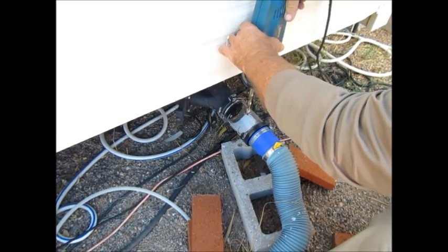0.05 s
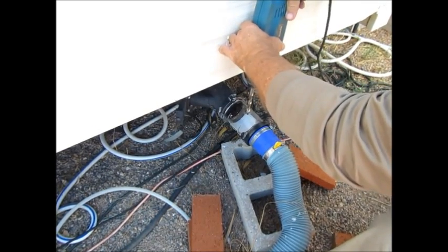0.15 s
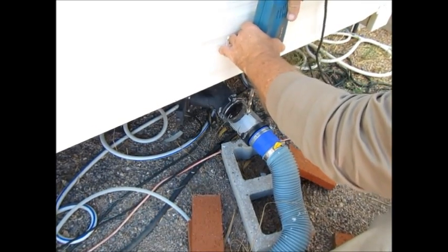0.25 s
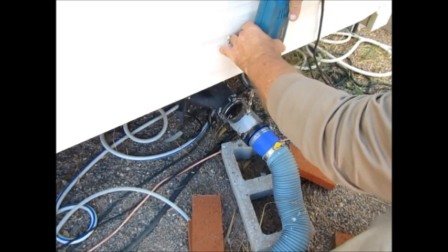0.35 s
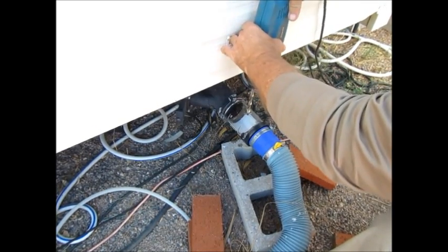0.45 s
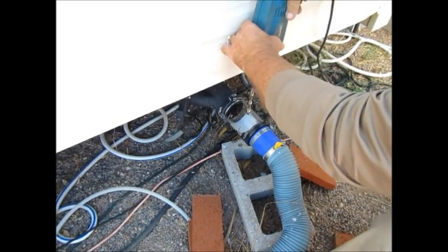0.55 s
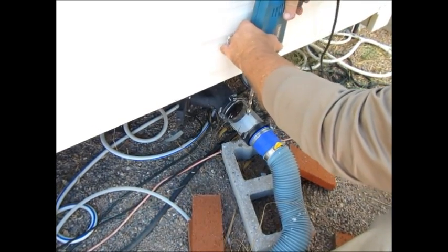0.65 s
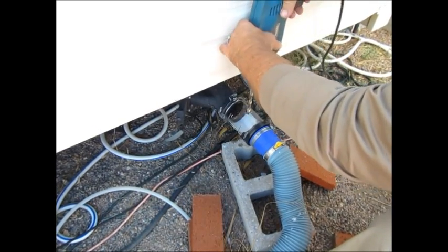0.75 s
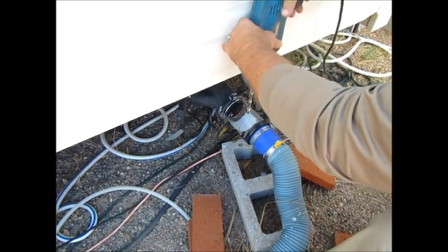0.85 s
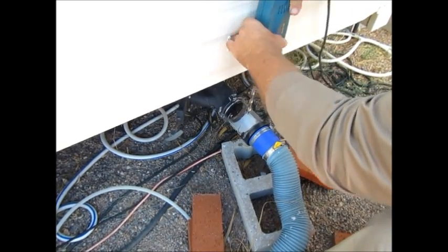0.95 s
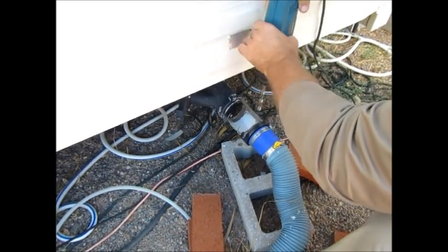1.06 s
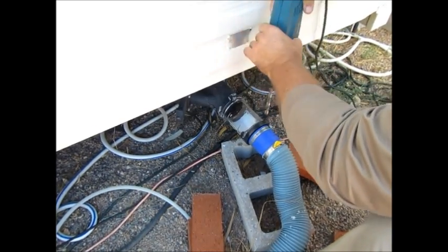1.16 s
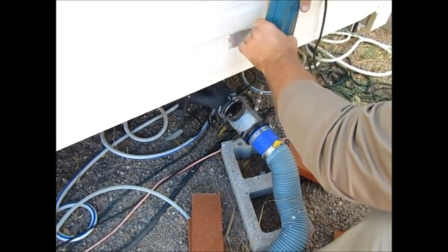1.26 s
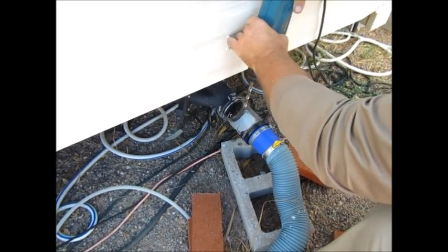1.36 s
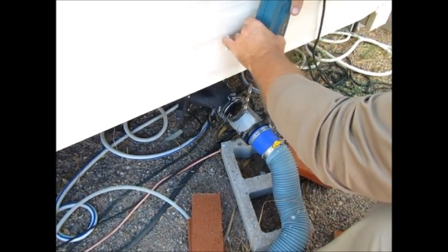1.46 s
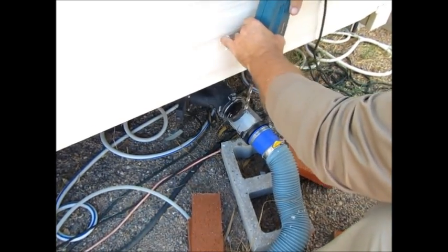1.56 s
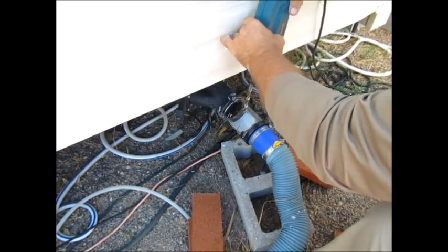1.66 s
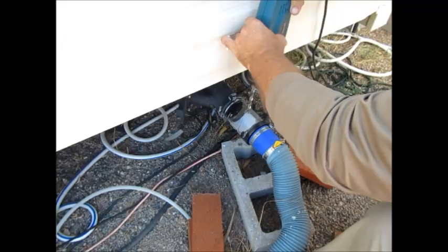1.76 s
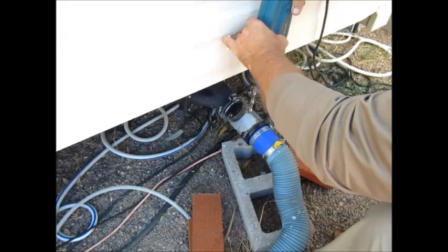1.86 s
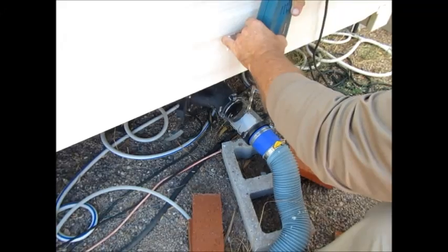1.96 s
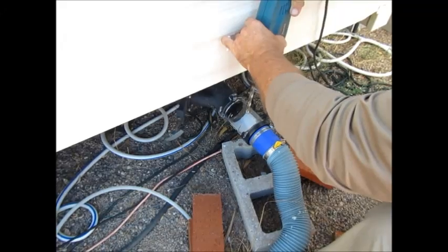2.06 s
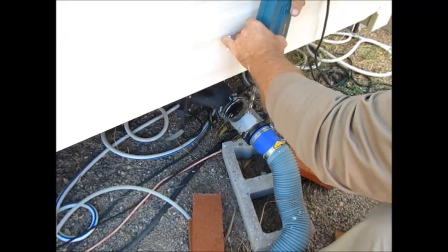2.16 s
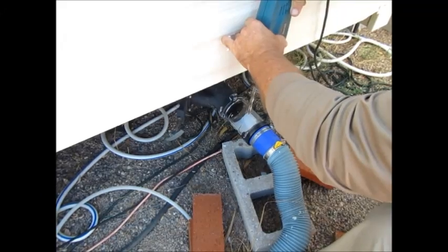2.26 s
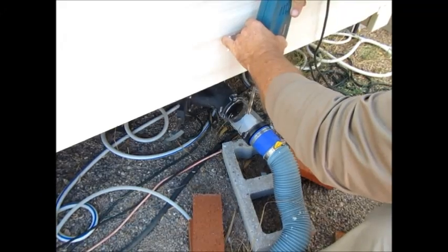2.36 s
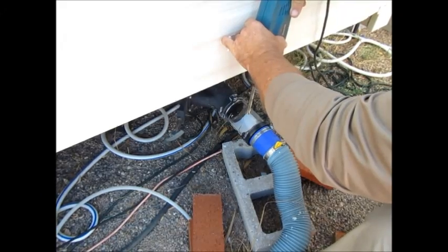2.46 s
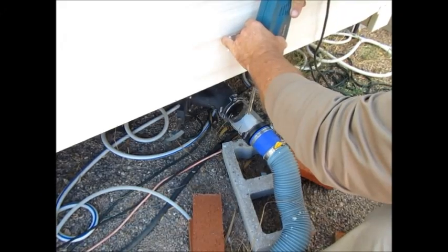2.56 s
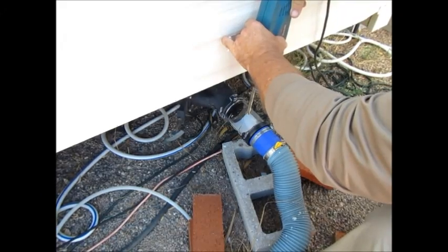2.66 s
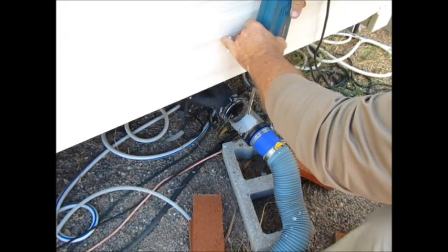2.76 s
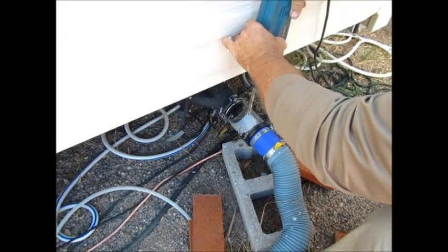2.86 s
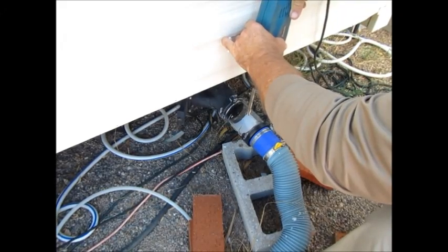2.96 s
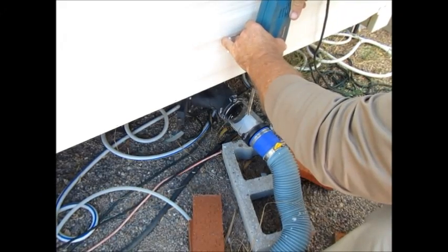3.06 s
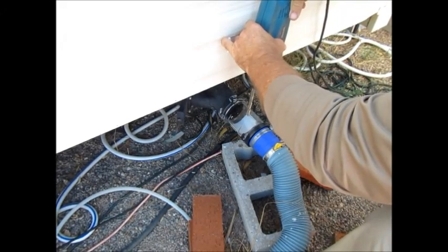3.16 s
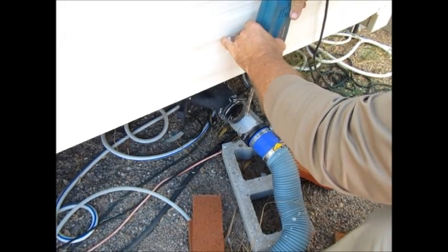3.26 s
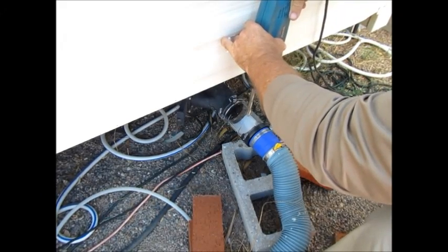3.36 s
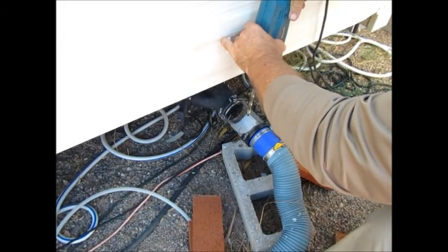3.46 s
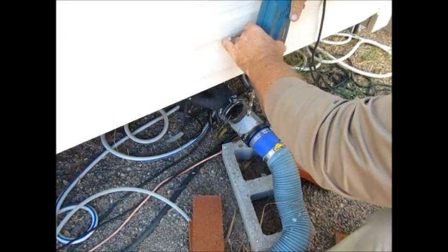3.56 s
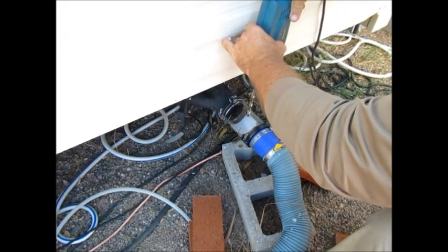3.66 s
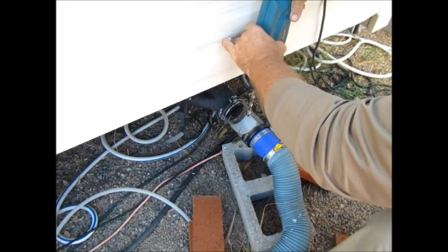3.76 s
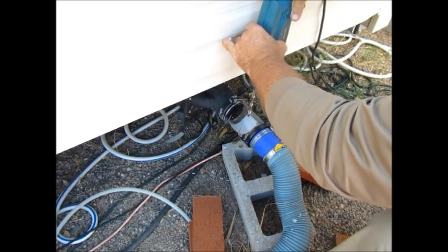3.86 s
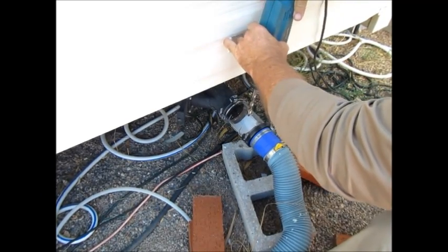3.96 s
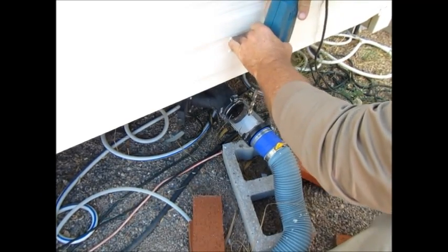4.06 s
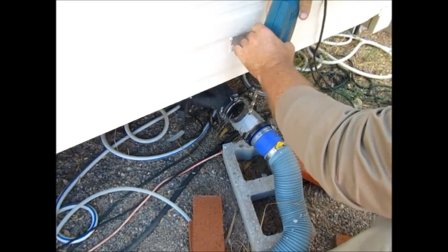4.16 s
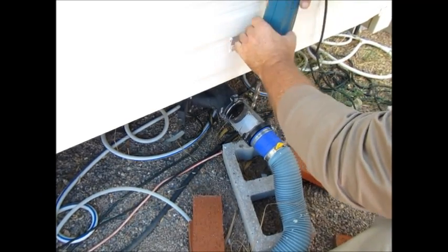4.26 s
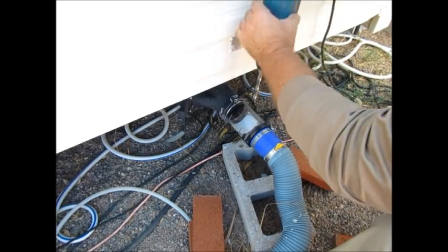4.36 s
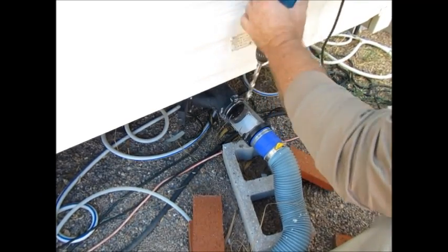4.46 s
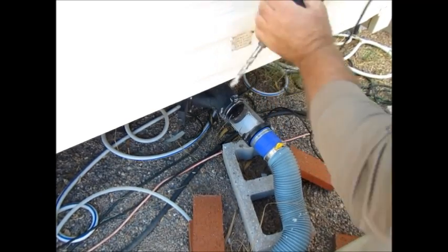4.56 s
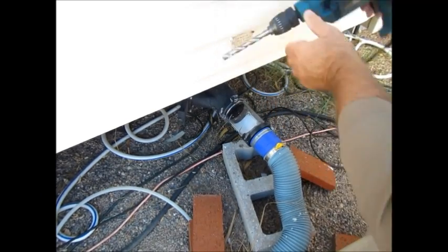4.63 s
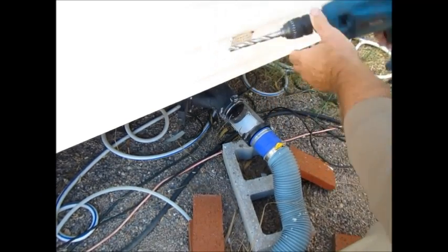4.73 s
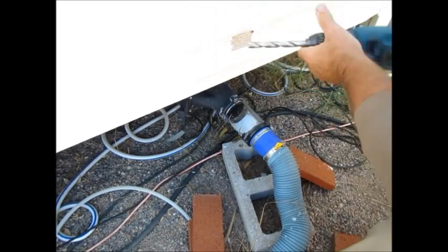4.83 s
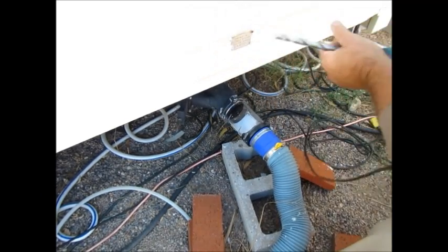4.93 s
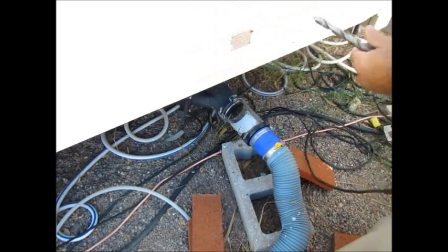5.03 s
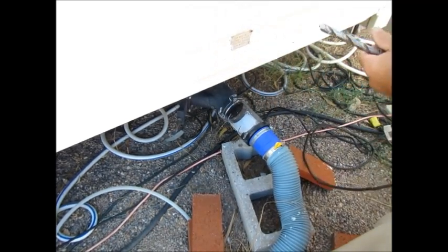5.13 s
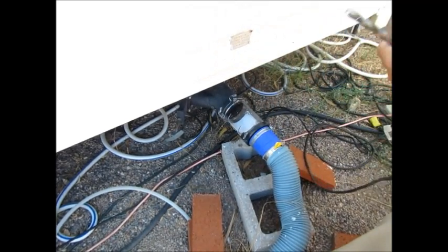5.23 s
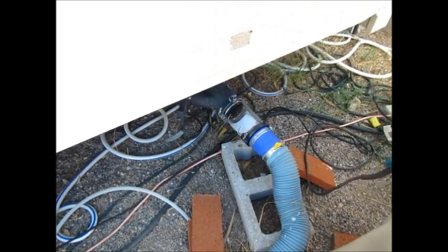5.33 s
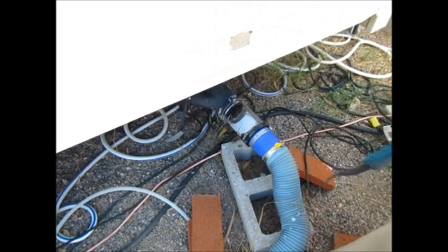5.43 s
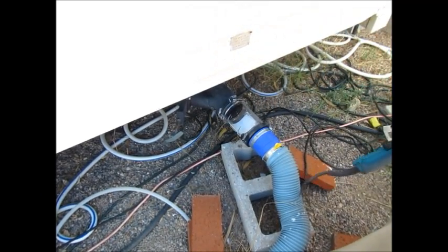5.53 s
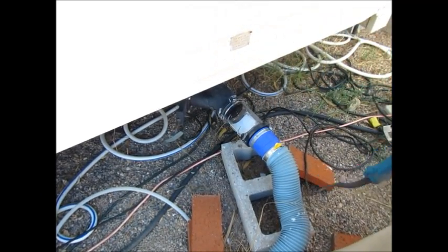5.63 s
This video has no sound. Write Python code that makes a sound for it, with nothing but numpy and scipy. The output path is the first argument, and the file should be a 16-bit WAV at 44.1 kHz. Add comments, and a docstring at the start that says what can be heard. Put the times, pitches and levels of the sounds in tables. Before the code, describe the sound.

A close, dry, centred outdoor sound of a mains drill on a plastic panel. It opens with the drill already coasting: a fluttering, chattering gear whine holds briefly, then drops and rattles out by about 0.6 s. Quiet follows, with far traffic rumble, a wavering low hum near 120 Hz and faint insect hiss, plus clicks and dull panel knocks, the firmest near 1.1 s. At 1.7 s the drill creeps on in a coarse, buzzing, pulsed growl. Around 2.3 s it surges, climbing quickly to a bright, piercing whine with dense grinding and brush hiss, roughly steady from 2.8 to 3.5 s. A sharp click at 3.5 s marks release; the whine glides down with loose gear chatter, falls quickly after 4 s and ends in a small rattle by about 4.3 s. Light ticks continue, with a soft knock at 5.3 s, until the end around 5.7 s.

```python
"""Outdoors in a yard, a mains hand drill coasts to a stop, starts slowly, bores a plastic panel and coasts again.
Motor whines are tones on multiples of the shaft speed; the drill's grind is coloured noise that comes in kicks.
With the motor running free, loose gear teeth chatter: fluttering tones on multiples of the tooth rate.
Hands knock the panel and small parts tick: short noise bursts. Behind them far traffic rumbles, a machine hums
and insects hiss, made of noise bands and a wavering tone. All of it reaches one microphone."""
import sys
import numpy as np
from scipy import signal
from scipy.fft import rfft, irfft
from scipy.io import wavfile
from scipy.ndimage import uniform_filter1d

SR = 44100
rng = np.random.default_rng(int(sys.argv[2]) if len(sys.argv) > 2 else 0)


def file_out(sig):
    """Save sig as 16-bit WAV at sys.argv[1]."""
    # one column per channel
    cols = np.atleast_2d(sig).T
    # limit, then scale
    lim = np.clip(cols, -1, 1)
    pcm = np.round(lim * 32767).astype(np.int16)
    wavfile.write(sys.argv[1], SR, pcm)


N = 250929  # length in samples

TEETH, WHEEL_TEETH = 4, 41  # gear teeth on the motor shaft's pinion and on the big wheel
SLOTS, BARS = 12, 24  # rotor slots and commutator bars: whine cycles per shaft turn
WHISTLES = (36, 37)  # whistle cycles per shaft turn

# colour of the brush hiss, relative: (frequency [Hz], level [dB])
BRUSH_HISS = [(3240, -20.5), (5500, 3), (6250, -5), (8020, -2), (11000, -5), (11800, -1.5), (13800, -3.5),
              (15100, -9.5), (15700, -5)]


def amp(db):
    """Turns decibels into a gain."""
    return 10 ** (np.asarray(db) / 20)


def evened(x):
    """Scales a signal to an average strength (rms) of 1."""
    return x / np.sqrt(np.mean(x ** 2) + 1e-20)


def read(points, hz):
    """Reads a table at the frequencies hz, in straight lines over a logarithmic scale."""
    f, value = np.transpose(points)
    return np.interp(np.log(hz + 1), np.log(f + 1), value)


def add(mix, start_s, sound):
    """Lays a sound into the mix at its start time."""
    part = mix[round(start_s * SR):][:len(sound)]
    part += sound[:len(part)]


def spread(rows):
    """Draws out a table sample by sample: the time, then every other column."""
    s, *columns = np.transpose(rows)
    t = np.arange(s[0], s[-1], 1 / SR)
    return [t] + [np.interp(t, s, column) for column in columns]


def shaped(x, points, peaks=()):
    """Colours x with a spectrum and resonance peaks, nearly silent outside the table; rms 1."""
    hz = np.fft.rfftfreq(len(x), 1 / SR)
    shut_ends = [(points[0][0] / 2, -70)] + list(points) + [(points[-1][0], -70)]
    gain = amp(read(shut_ends, hz))
    gain *= 1 + sum(amp(db) / (1 + (2 * (hz - f) / width) ** 2) for f, width, db in peaks)
    return evened(irfft(rfft(x) * gain, len(x)))


def wander(n, hz):
    """Slow random curve of about rms 1, with changes up to hz."""
    lowpass = signal.butter(2, hz, fs=SR, output="sos")
    slow = signal.sosfiltfilt(lowpass, rng.standard_normal(n), padtype="even")
    return np.clip(evened(slow), -2.5, 2.5)


def tone(turns, db, flutter_db, flutter_hz):
    """A tone, one cycle per turn, whose level and phase flutter."""
    slip = rng.uniform(0, 2 * np.pi) + 0.13 * flutter_db * wander(len(turns), flutter_hz)
    level = amp(db + flutter_db * wander(len(turns), flutter_hz))
    return np.sqrt(2) * level * np.cos(2 * np.pi * turns + slip)


def yard():
    """Far rumble and air are lumpy noise made of random short spectra; a hum and insect bands lie on top."""
    # colour of the far rumble, relative: (frequency [Hz], level [dB])
    far_colour = [(15, -31), (25, 1.5), (53, 3.5), (119, -3.5), (150, -9.5), (235, -4.5), (290, -17.5),
                  (404, -8), (647, -18.5), (839, -19.5), (1140, -23.5), (1220, -27), (1700, -30.5),
                  (2480, -38.5), (7000, -92), (9100, -87), (15400, -120)]
    # how loud the background is heard over time:
    # (time [s], level [dB], brightness [dB per octave], hum [dB], thin hiss [dB])
    background_levels = [(0, -49.5, 7.5, -46.5, -55), (.55, -46, 4, -49, -66), (1.25, -40.5, 2, -45, -62),
                         (1.6, -38.5, 3.5, -44.5, -61.5), (2.3, -34, 0.5, -44.5, -54),
                         (2.7, -44.5, 2.5, -42.5, -65), (3.5, -29.5, -2, -41.5, -68),
                         (3.66, -51.5, 8.5, -51, -67), (4.27, -42, 5.5, -47.5, -67),
                         (4.5, -40.5, 2.5, -57.5, -64), (5, -40.5, 3, -50, -61),
                         (5.4, -37.5, 3, -43.5, -58), (5.69, -36, 2.7, -45.5, -60)]
    # colour of the thin air hiss, relative: (frequency [Hz], level [dB])
    air_colour = [(2500, 3.5), (4000, 2), (9000, -5.5), (11800, -9), (12500, -13.5), (15900, -15)]
    # insect bands: (frequency [Hz], width [Hz], level [dB])
    insects = [(7850, 500, -70), (9700, 220, -85), (11200, 180, -83)]
    hum_hz = 121.2  # a far machine

    frames, hz = N // 256 + 5, np.fft.rfftfreq(1024, 1 / SR)
    real, imaginary, patches = rng.standard_normal((frames, 513, 3)).T
    random_spectra = real + 1j * imaginary
    patches = evened(uniform_filter1d(uniform_filter1d(patches, 10, 0), 10, 1))
    s, level_db, tilt_db, hum_db, air_db = np.transpose(background_levels)
    t = np.arange(frames) * 256 / SR
    octaves = np.log2(1 + hz / 300)[:, None]
    field_db = read(far_colour, hz)[:, None] + 1.7 * patches
    # the scale is set before the level changes
    scale = 1 / np.std(signal.istft(random_spectra * amp(field_db), nperseg=1024, noverlap=768)[1])
    field_db = field_db + np.interp(t, s, level_db) + octaves * np.interp(t, s, tilt_db)
    out = scale * signal.istft(random_spectra * amp(field_db), nperseg=1024, noverlap=768)[1][:N]

    now = np.arange(N) / SR
    out += tone(hum_hz * now, np.interp(now, s, hum_db), 4.75, 24.4)
    # little reaches below the rumble
    out = signal.sosfilt(signal.butter(2, 38, "high", fs=SR, output="sos"), out)
    air_level = amp(np.interp(now, s, air_db) + 2 * wander(N, 22.3))
    out += air_level * shaped(rng.standard_normal(N), air_colour)
    for f, width, db in insects:
        edges = [(f - width, -30), (f - width / 2, 0), (f + width / 2, 0), (f + width, -30)]
        band = shaped(rng.standard_normal(N), edges)
        out += amp(db + 0.73 * wander(N, 2.7)) * band
    return out


def handling():
    """Knocks set the damped panel thudding; ticks are short bursts around their own centre."""
    # dull knocks: (time [s], peak [dB], time to fade by 60 dB [s], brightness [dB per octave])
    knocks = [(0.756, -29.5, 0.093, -4), (1.074, -20, 0.1, 3.5), (1.096, -33, 0.045, -2),
              (5.34, -30, 0.056, 2.5)]
    # how the knocked panel sounds, relative: (frequency [Hz], level [dB])
    panel = [(88, -40), (150, -9.5), (295, 3.5), (492, 4), (641, -15.5), (835, -8), (1980, -28),
             (2100, -22), (2950, -33), (5000, -55), (6500, -75), (11000, -120)]
    # ticks of switch, chuck and grit:
    # (time [s], peak [dB], centre [Hz], time to fade by 60 dB [s], top end against the centre [dB])
    ticks = [(0.5736, -44, 2560, 0.023, -33), (0.594, -33, 2310, 0.035, -31), (0.609, -41, 2470, 0.02, -37),
             (0.93, -40, 1970, 0.039, -30), (0.973, -32.5, 1900, 0.051, -35.5),
             (1.5194, -43, 2130, 0.025, -28), (1.531, -34.5, 2000, 0.035, -21.5),
             (1.6394, -65, 2280, 0.019, -28), (1.853, -22, 1980, 0.024, -45), (3.494, -7, 2000, 0.019, -45),
             (4.22, -40, 3400, 0.02, -29), (4.29, -39, 4800, 0.026, -30), (4.347, -45, 2600, 0.025, -32),
             (4.438, -46, 4500, 0.025, -27), (4.5148, -28.5, 2040, 0.02, -45),
             (4.8274, -32, 6100, 0.031, -16), (5, -42, 2460, 0.035, -25), (5.193, -37, 2320, 0.028, -39),
             (5.34, -41, 2300, 0.016, -15), (5.4902, -37, 2700, 0.027, -28), (5.567, -35, 2560, 0.025, -31)]

    out, t = np.zeros(N), np.arange(SR // 8) / SR
    for s, db, fade_s, tilt_db in knocks:
        colour = [(hz, level + tilt_db * np.log2(hz / 300)) for hz, level in panel]
        swing = amp(-60 * t / abs(fade_s)) * (1 - np.exp(-t / 0.0014))  # quick rise, then decay
        thud = shaped(rng.standard_normal(len(t)), colour) * swing
        add(out, s, amp(db) * thud / abs(thud).max())
    for s, db, hz, fade_s, top_db in ticks:
        colour = [(900, -18), (hz, 0), (6500, 0.63 * top_db), (15900, top_db)]
        burst = shaped(rng.standard_normal(len(t)), colour) * amp(-60 * t / abs(fade_s))
        add(out, s, amp(db) * burst / abs(burst).max())
    return out


def coast(speed, rows, octave_db):
    """Running free, teeth slap their backs at the tooth rate; the big wheel runs out of true once a turn."""
    # housing response to the tooth rate and its multiples: (frequency [Hz], level [dB])
    housing = [(300, -14), (700, -8), (850, -3), (990, -8), (1100, 2), (1190, 0), (1240, -12), (1290, -2),
               (1400, -5), (1700, 3), (2100, -3), (2300, 0), (2550, 3), (2900, -4), (3350, 0), (4000, -8),
               (4500, -2), (5000, -8), (5700, -1), (6300, -16), (8000, -11), (9200, -17), (11500, -13),
               (16000, -15)]
    # whistle over the hiss: (shaft speed [Hz], level [dB])
    free_whistle = [(200, -40), (285, -22), (310, -11), (350, -10), (400, -17), (440, -22)]
    # colour of the whirr, relative: (frequency [Hz], level [dB])
    whirr_colour = [(180, -37), (300, -13.5), (611, -13.5), (828, 0), (920, -7.5), (1170, -1), (1460, 3),
                    (3350, -4), (4130, -11), (5670, -13), (7000, -21), (9100, -60), (15400, -120)]
    # resonances in the whirr: (frequency [Hz], width [Hz], added gain [dB])
    whirr_modes = [(1120, 75, 2.5), (1657, 110, -1.5), (2500, 200, -0.5), (3460, 230, 2.5), (5000, 790, 4)]
    # chuck rattling as the last teeth roll: (frequency [Hz], width [Hz], added gain [dB])
    rings = [(420, 200, 14), (740, 90, 16), (1640, 60, 19), (2690, 70, 13)]
    first_over_db, upper_over_db = 1, -5.5  # tooth rate and its multiples from the third, over the chatter

    t, chatter_db, whirr_db = spread(rows)
    shaft_hz = np.interp(t, *np.transpose(speed))
    tooth_hz = TEETH * shaft_hz
    teeth = TEETH * np.cumsum(shaft_hz) / SR
    wobble = np.cos(2 * np.pi * (teeth / WHEEL_TEETH + rng.random()))
    # the pinion's teeth differ: sidebands one shaft turn apart
    uneven = np.cos(2 * np.pi * teeth / TEETH)
    first_db = chatter_db + first_over_db + read(housing, tooth_hz)
    second_db = chatter_db + octave_db + read(housing, 2 * tooth_hz)
    out = tone(teeth, first_db + 1.74 * wobble, 1.0, 86)
    out += tone(2 * teeth, second_db + 0.73 * wobble + 1.6 * uneven, 2.77, 114)
    for k in range(3, 21):
        db = chatter_db + upper_over_db + read(housing, k * tooth_hz)
        db = db - 6 * np.log2(k / 3) - np.maximum(k - 12, 0)  # higher multiples are weaker
        db = db + wobble + 1.3 * uneven
        broken = 3.1 * wander(len(t), 33)  # each multiple comes and goes
        out += tone(k * teeth, db + broken, 3.1, 104) * (k * tooth_hz < SR / 2.5)

    # brush hiss: -34 dB at 300 shaft Hz, falling 11.5 dB per octave as the rotor slows
    hiss_db = -34 + 11.5 * np.log2(np.minimum(shaft_hz, 340) / 300)
    whistle_db = hiss_db + read(free_whistle, shaft_hz)
    out += sum(tone(teeth * order / TEETH, whistle_db, 3, 70) for order in WHISTLES)
    noise = rng.standard_normal((2, len(t))) * amp(.8 * wander(len(t), 60))
    out += amp(whirr_db) * shaped(noise[0], whirr_colour, whirr_modes)
    out += amp(hiss_db) * shaped(noise[1], BRUSH_HISS)

    # the rattle comes in below 95 shaft Hz and dies as the rotor crawls to rest
    crawling = np.clip((95 - shaft_hz) / 30, 0, 1)
    rattle_db = -39.5 + 9 * np.log2(shaft_hz / 70)
    out += crawling * amp(rattle_db) * shaped(rng.standard_normal(len(t)), whirr_colour, rings)
    return t[0], out * signal.windows.tukey(len(t), .02)


def drive():
    """The speed control fires once a mains cycle, then twice: each kick rattles gears and brushes."""
    # motor under power, creeping on a light trigger first: (time [s], shaft speed [Hz])
    powered_speed = [(1.68, 25), (1.78, 50), (1.918, 92.6), (2.022, 115.6), (2.1, 128.8), (2.268, 151.6),
                     (2.3, 185), (2.394, 289), (2.428, 314), (2.506, 351.5), (2.562, 368), (2.672, 393.5),
                     (2.768, 409.5), (2.836, 417.5), (2.912, 425.5), (3, 431), (3.15, 435.5), (3.56, 437.5)]
    # (time [s], grind [dB], brush hiss [dB], panel rumble [dB])
    load = [(1.68, -37.5, -61, -52), (1.73, -32.5, -52, -48), (1.79, -32.5, -50, -46),
            (1.9, -33.5, -44.5, -67), (2.2, -27.5, -41.5, -54), (2.29, -29.5, -38.5, -45.5),
            (2.33, -23, -32, -36.5), (2.46, -22.5, -27, -37), (2.7, -20, -24, -32), (3, -20, -24.5, -32),
            (3.3, -20.5, -26.5, -31), (3.52, -20, -25, -34), (3.56, -29, -34, -32)]
    # the bit catches: (time [s], rise [dB])
    catches = [(2.186, 1), (2.255, 7), (3.04, 2), (3.1, 0.5), (3.21, 1.5), (3.48, 2)]
    # housing and panel under the bit, relative: (frequency [Hz], level [dB])
    grind_colour = [(290, -46), (500, -3.5), (652, -11), (822, 0.5), (938, -5.5), (1120, 1), (1310, 0.5),
                    (1720, 1), (1970, 0.5), (3300, -1.5), (4400, -9), (4810, -11.5), (5490, -4.5),
                    (6270, -20.5), (7000, -27), (9100, -69), (15400, -120)]
    # resonances in the grind: (frequency [Hz], width [Hz], added gain [dB])
    grind_modes = [(436, 110, -13), (1122, 140, -6), (1740, 310, -13), (2480, 7, 7), (4850, 100, 8.5),
                   (6000, 250, -6)]
    # resonances of the brush holders: (frequency [Hz], width [Hz], added gain [dB])
    brush_modes = [(9400, 300, -6), (11750, 350, -6.5), (13500, 300, -13), (15000, 370, -9)]
    # colour of the panel rumble, relative: (frequency [Hz], level [dB])
    rumble_colour = [(24, -42), (40, -9), (112, 0.5), (159, 0), (278, -10.5), (371, -5), (418, -3.5),
                     (606, -18.5), (700, -5.5), (910, -6), (1540, -120)]
    # how the motor case radiates the magnetic whine: (frequency [Hz], level [dB])
    whine = [(1000, -24), (1800, -9), (2300, -2), (2700, -1.5), (3700, 2.5), (4100, -6.5), (4300, -11),
             (5000, -34), (8500, -6), (10500, -4), (12500, -25), (22000, -40)]
    mains_hz, first_kick_s, full_wave_s = 60, 1.7045, 2.3  # two kicks a cycle from full_wave_s on
    slot_base_db, bar_base_db, bar_octave_base_db = -30, -35.5, -46  # before the case response

    t, grind_db, hiss_db, rumble_db = spread(load)
    shaft_hz = np.interp(t, *np.transpose(powered_speed))
    catch_db = sum(db * np.exp(-((t - s) / 0.015) ** 2) for s, db in catches)
    # hiss follows a catch less than the grind does, rumble more
    grind_db = grind_db + catch_db
    hiss_db = hiss_db + 0.7 * catch_db
    rumble_db = rumble_db + 2.7 * catch_db

    halves = np.where(t < full_wave_s, 1, 2)
    kicks = (t - first_kick_s) * mains_hz * halves
    since_s = kicks % 1 / mains_hz / halves
    strength = amp(2.1 * rng.standard_normal(600))[np.floor(kicks).astype(int) % 600]
    jolt = strength * (kicks >= 0) * (1 - np.exp(-since_s / .0004)) * np.exp(-(since_s / .0036) ** 2)
    # share that comes in kicks: 0.64 at 50 shaft Hz; it blurs with speed
    kick_share = np.clip(0.64 - 0.19 * np.log2(shaft_hz / 50), 0, 1)
    gate = (1 - kick_share) + kick_share * evened(jolt)
    # the bit catches and slips in the plastic
    bite = amp(1.08 * wander(len(t), 35) + 1.6 * wander(len(t), 350))
    noise = rng.standard_normal((3, len(t)))
    grind = shaped(amp(grind_db) * gate * bite * noise[0], grind_colour, grind_modes)
    out = grind * np.sqrt(np.mean(amp(2 * grind_db)))  # shaped() evened it: give the level back
    out += amp(hiss_db) * gate ** .75 * bite ** .4 * shaped(noise[1], BRUSH_HISS, brush_modes)
    out += amp(rumble_db) * shaped(noise[2], rumble_colour)

    turns = np.cumsum(shaft_hz) / SR
    slot_db = slot_base_db + read(whine, SLOTS * shaft_hz)
    slot_db += 22 * np.log2(np.minimum(shaft_hz / 250, 1))  # grows as the rotor picks up
    bar_db = bar_base_db + read(whine, BARS * shaft_hz)
    octave_db = bar_octave_base_db + read(whine, 2 * BARS * shaft_hz)
    # the whistle grows with shaft speed up to 310 Hz and thins out at the very top
    whistle_db = -34 + 30 * np.log2(np.minimum(shaft_hz / 310, 1))
    whistle_db -= .02 * np.maximum(WHISTLES[0] * shaft_hz - 15300, 0)
    pulsing = np.cos(2 * np.pi * kicks)  # the current swings with the mains
    out += tone(SLOTS * turns, slot_db + 8 * pulsing + 2 * wander(len(t), 30), 4.3, 200)
    out += tone(BARS * turns, bar_db + 0.56 * pulsing, 1.2, 61)
    out += tone(2 * BARS * turns, octave_db + 1.3 * pulsing, 1.1, 76)
    out += tone(WHISTLES[0] * turns, whistle_db - 4, 3, 70)
    out += tone(WHISTLES[1] * turns, whistle_db, 3, 70)
    for k in (3, 4, 5):  # rough higher multiples of the commutator rate, under the hiss level
        db = hiss_db - 19.5 + 3 * wander(len(t), 15)
        out += tone(k * BARS * turns, db, 4, 120) * (k * BARS * shaft_hz < SR / 2.5)
    out += tone(turns, rumble_db - 9.5, 0.87, 28)  # rotor imbalance
    return t[0], out * signal.windows.tukey(len(t), .015)


def scene():
    """Adds up the yard, the handling, two run-downs and the powered drill; both channels are alike."""
    # motor running free, one table a run-down: (time [s], shaft speed [Hz])
    coast_speeds = [
        [(0, 300), (.086, 277.5), (.115, 275), (.24, 281), (.29, 281), (.42, 143), (.48, 93), (.52, 55),
         (.6, 8)],
        [(3.535, 437), (3.546, 437), (3.662, 365), (3.708, 340), (3.784, 309), (3.852, 289), (3.92, 277),
         (3.988, 268), (4.14, 98), (4.175, 65), (4.42, 15)],
    ]
    # its sound, one table a run-down: (time [s], gear chatter [dB], whirr [dB])
    coast_levels = [
        [(0, -24.5, -19), (.05, -22, -30.5), (.2, -23, -31.5), (.3, -21.5, -30.5), (.37, -24.5, -27.5),
         (.46, -32, -28), (.51, -38.5, -37), (.55, -67, -54), (.6, -80, -80)],
        [(3.535, -19, -29), (3.55, -18.5, -25.5), (3.65, -26.5, -28), (3.78, -23, -28), (3.83, -19.5, -32),
         (3.98, -20, -28), (4.1, -23.5, -29), (4.16, -27.5, -41), (4.2, -41, -50), (4.28, -80, -61),
         (4.42, -82, -69)],
    ]
    # octave of the tooth rate over the chatter, one value a run-down: level [dB]
    octave_levels = [2.5, -3]

    mix = yard() + handling()
    run_downs = [coast(*run) for run in zip(coast_speeds, coast_levels, octave_levels)]
    for start_s, sound in run_downs + [drive()]:
        add(mix, start_s, sound)
    return np.array([mix, mix])


def record(dry):
    """The microphone port cuts a narrow notch; then a steep filter removes the highest treble."""
    notch_hz, notch_width_hz, notch_share, edge_hz = 12420, 200, .95, 15800
    peak = signal.lfilter(*signal.iirpeak(notch_hz, notch_hz / notch_width_hz, SR), dry)
    band_limit = signal.firwin(2047, edge_hz, window=("kaiser", 8), fs=SR)
    return signal.oaconvolve(dry - notch_share * peak, band_limit[None], "same")


dry = scene()
out = record(dry)
file_out(out)
```